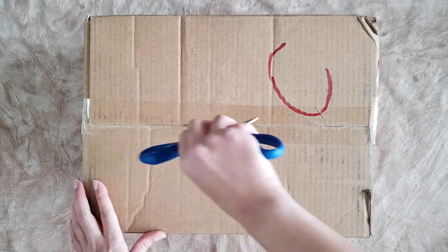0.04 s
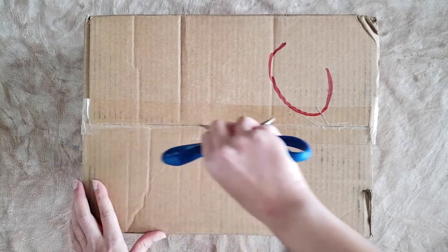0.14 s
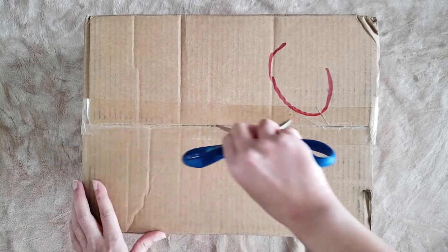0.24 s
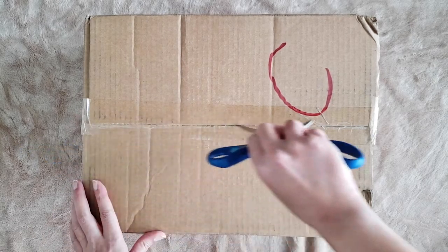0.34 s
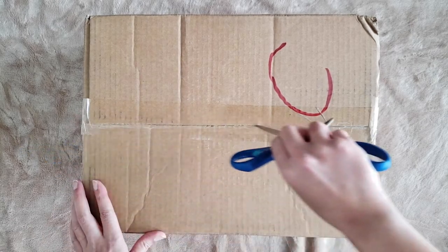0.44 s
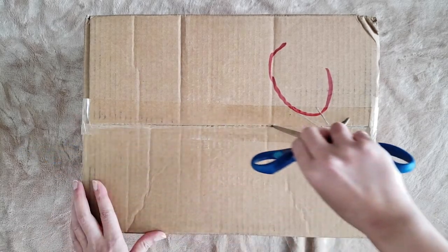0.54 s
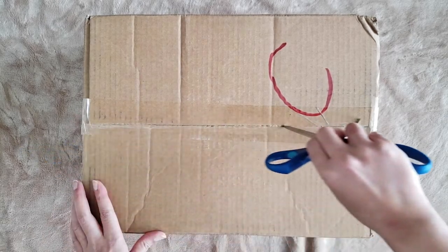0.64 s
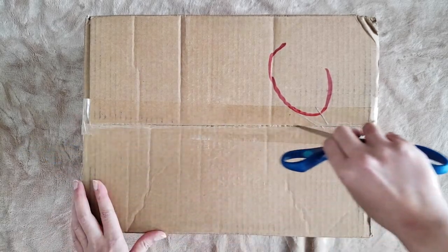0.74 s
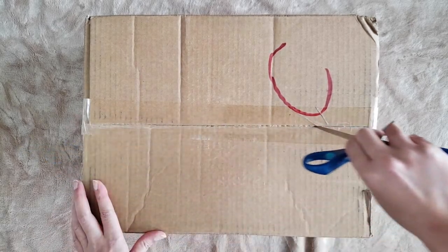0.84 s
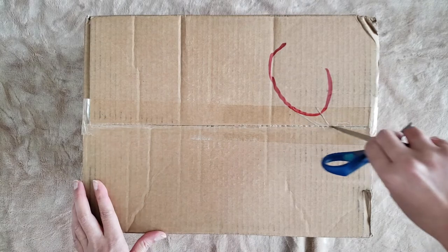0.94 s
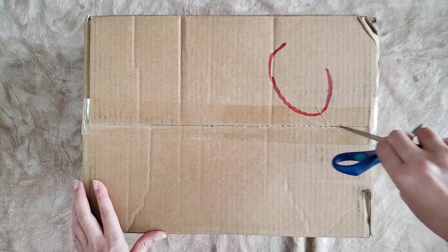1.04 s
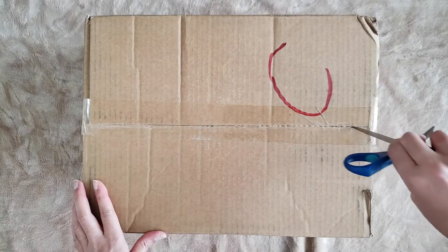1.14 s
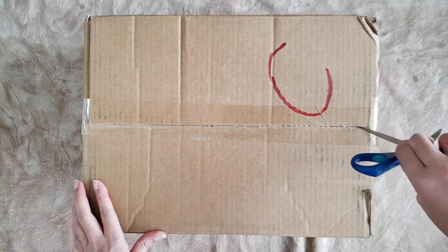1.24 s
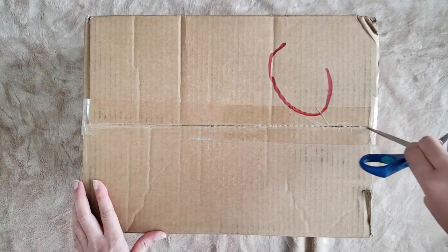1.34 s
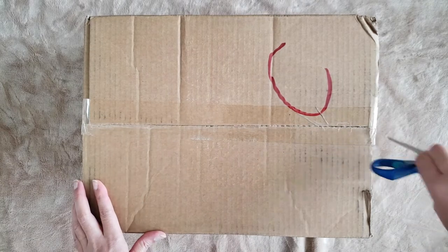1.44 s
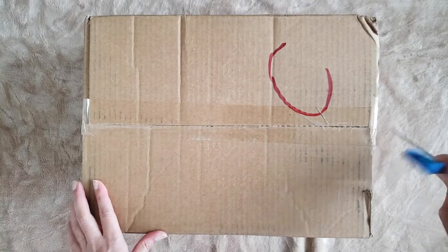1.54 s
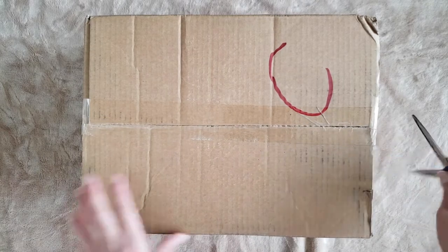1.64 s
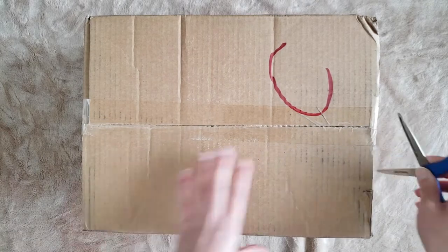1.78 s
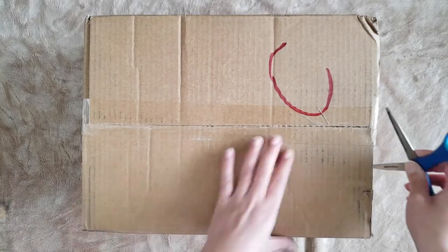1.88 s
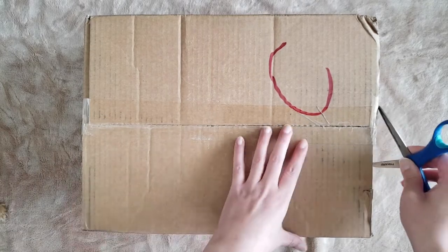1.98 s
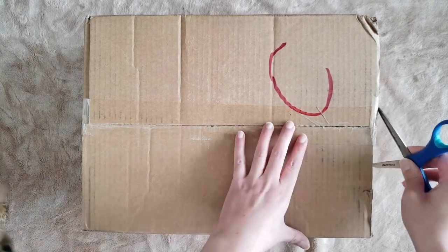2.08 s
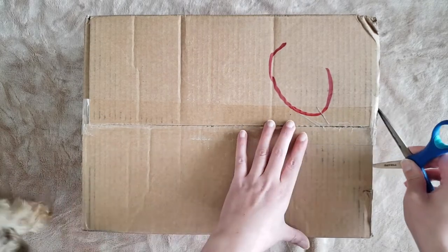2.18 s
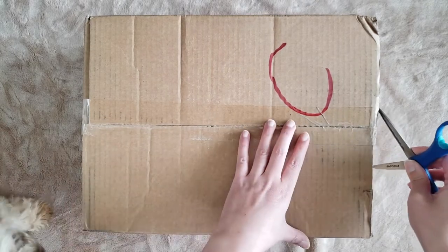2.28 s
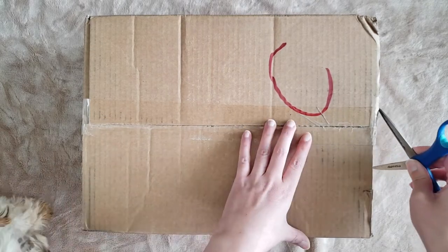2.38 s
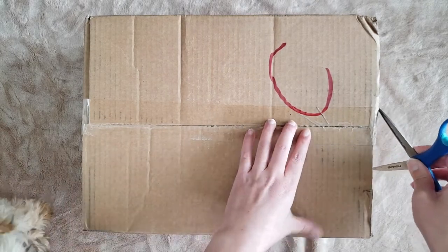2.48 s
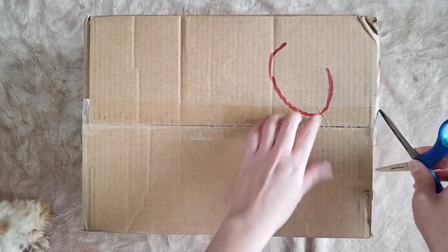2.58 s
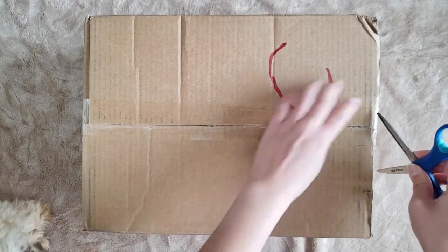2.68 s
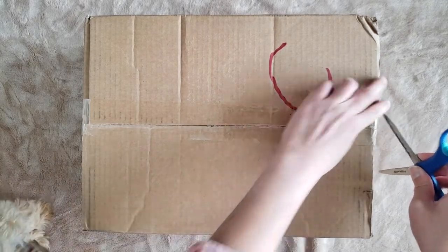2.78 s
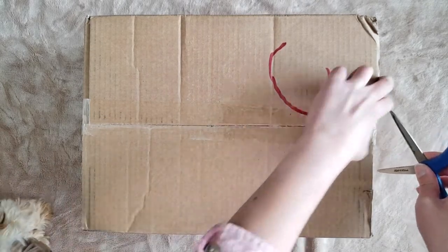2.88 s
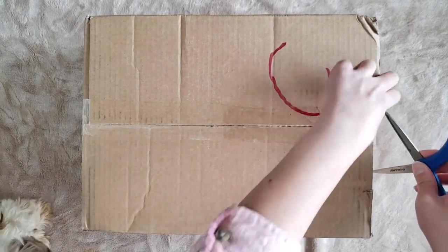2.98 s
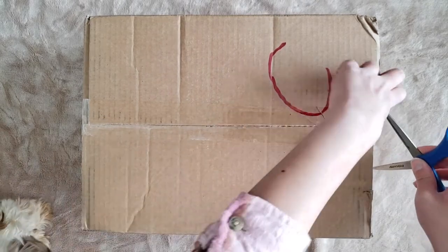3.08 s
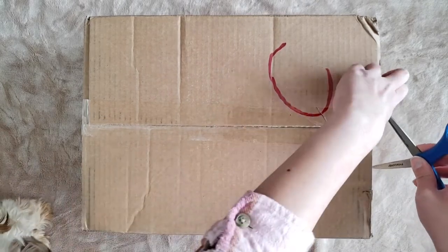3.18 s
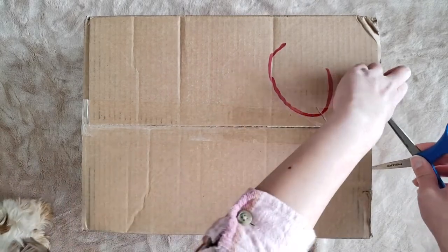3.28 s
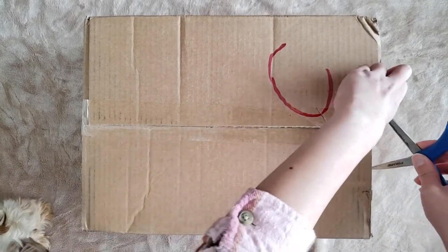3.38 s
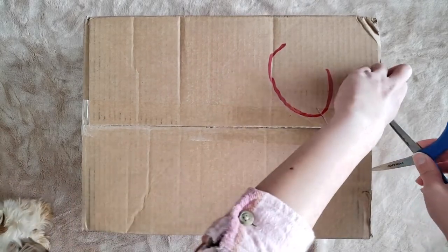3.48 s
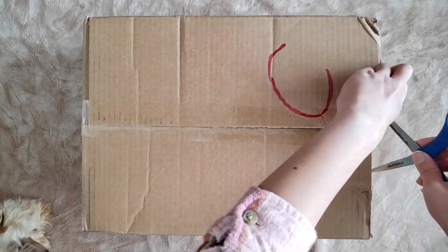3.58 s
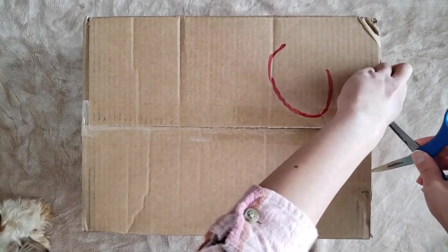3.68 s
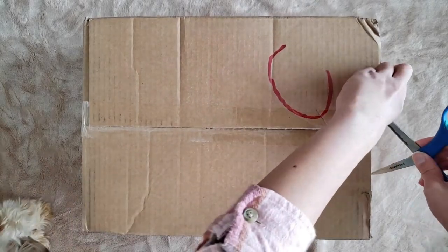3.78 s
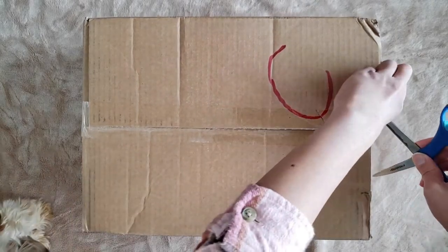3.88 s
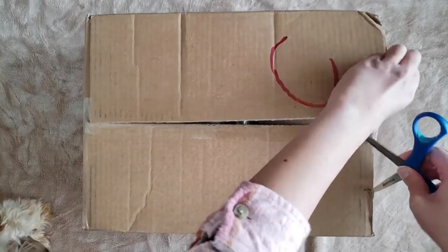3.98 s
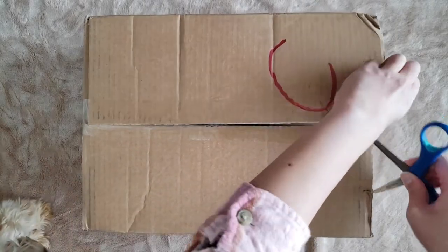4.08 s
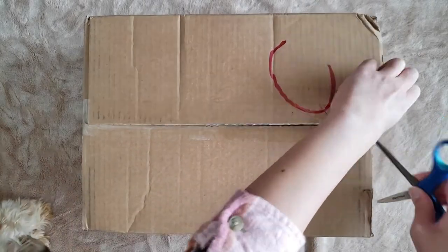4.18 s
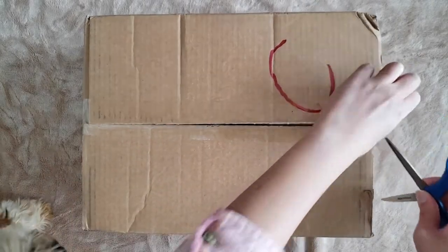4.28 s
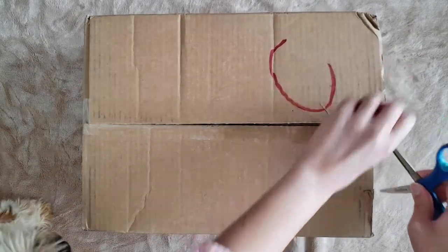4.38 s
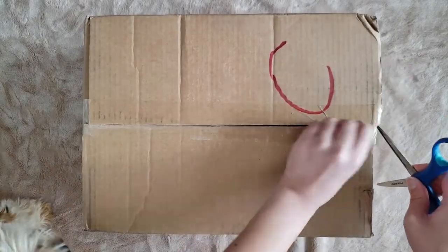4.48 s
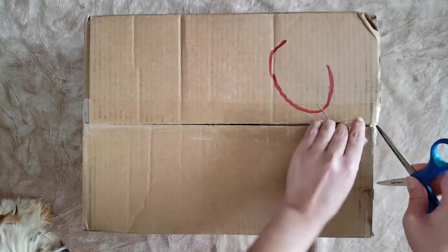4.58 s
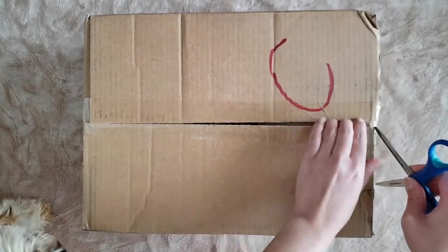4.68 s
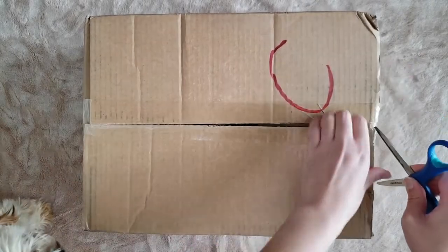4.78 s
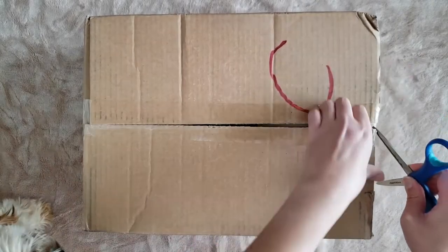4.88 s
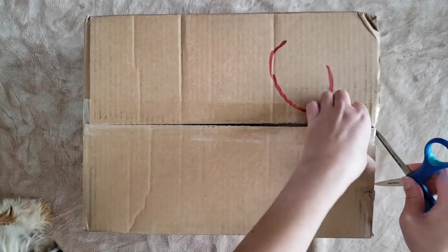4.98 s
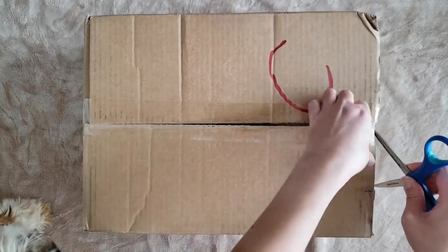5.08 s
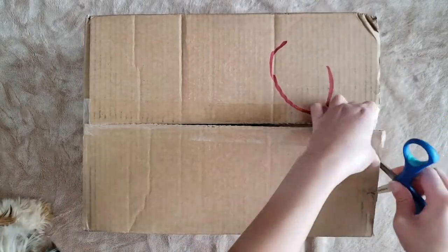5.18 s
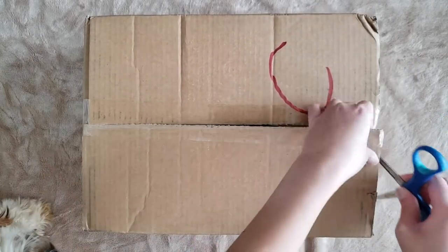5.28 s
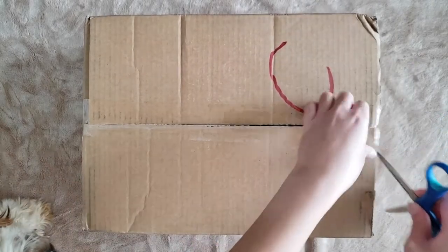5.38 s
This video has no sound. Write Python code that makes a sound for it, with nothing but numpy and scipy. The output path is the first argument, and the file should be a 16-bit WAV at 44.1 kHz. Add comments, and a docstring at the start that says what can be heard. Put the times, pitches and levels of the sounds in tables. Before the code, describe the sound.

Packing tape is slit with a scissor blade, a quick, ribbed scraping over hollow cardboard. After a brief swish comes a quieter stretch of hand rubbing, light taps and crinkling tape. The ticks grow busier until the scissors snip through taut tape with a crack and a thump, then snip again. The microphone is close, in a small room with a faint low hum.

```python
"""Slitting a taped cardboard box.

A scissor blade is drawn along the seam, close up in a small room. It skips from rib to rib,
each slip a rasp of tape and a kick into the box. Then a hand rubs and knocks on the lid,
the tape crackles, the blades click, and two snips snap the taut ends and jolt the flaps."""
import sys
import numpy as np
from scipy import signal
from scipy.fft import rfft, irfft, next_fast_len
from scipy.io import wavfile

SR = 44100
rng = np.random.default_rng(int(sys.argv[2]) if len(sys.argv) > 2 else 0)


def generate_wav(signal):
    """Clip the signal to [-1, 1] and save it as 16-bit WAV at the path in sys.argv[1]."""
    frames = np.transpose(np.atleast_2d(signal))
    scaled = np.clip(frames, -1, 1) * 32767
    pcm = np.round(scaled).astype(np.int16)
    wavfile.write(sys.argv[1], SR, pcm)


N = 239507
TIME = np.arange(N) / SR

# blade speed: t/s, rate/(ribs/s)
BLADE_SPEED = [(0.0, 34.32), (0.273, 27.87), (0.293, 45.16), (0.415, 36.46), (0.507, 37.99), (0.525, 19.56),
               (0.608, 43.57), (0.705, 11.63), (0.767, 38.92), (0.805, 30.59), (0.922, 38.96),
               (0.984, 20.33), (1.168, 18.18), (1.32, 7.38)]
# blade pressure on the seam: t/s, rasp/dB, treble/dB, kick/dB
BLADE_BITE = [(0, -28.5, -29.5, -26), (.14, -37.5, -40, -30.5), (.205, -24.5, -30, -22),
              (.27, -24.5, -27, -22.5), (.345, -31, -38.5, -30), (.41, -24.5, -37.5, -19.5),
              (.455, -29.5, -37.5, -28.5), (.61, -35, -38.5, -28.5), (.66, -38.5, -41.5, -23.5),
              (.8, -37, -46.5, -39), (.87, -30, -38.5, -23), (1.04, -35.5, -35, -24.5),
              (1.1, -29.5, -33, -25), (1.155, -26, -32.5, -26), (1.21, -32.5, -38.5, -33.5),
              (1.3, -35, -34.5, -39)]
def slips():
    """One slip per rib; a harder bite lets go faster. Rows: t/s, rasp/dB, treble/dB, length/s, kick/dB."""
    ribs_per_s = follow(BLADE_SPEED) * (TIME < BLADE_SPEED[-1][0])
    ribs_crossed = np.floor(.5 + np.cumsum(ribs_per_s) / SR)
    at = np.flatnonzero(np.diff(ribs_crossed))
    stretch, kick_jitter = rng.standard_normal((2, len(at)))
    rasp_db, treble_db, kick_db = (follow(BLADE_BITE, column)[at] for column in (1, 2, 3))
    length_s = 0.0077 * np.exp(0.16 * stretch - 0.0047 * (rasp_db - rasp_db.mean()))
    return np.c_[TIME[at], rasp_db, treble_db, length_s, kick_db + 0.3 * kick_jitter]


# lid stiffening toward the edge: t/s, box pitch/ratio, corner/Hz
LID_STIFFNESS = [(0, 0.9, 290), (.25, 0.89, 237), (.42, 1, 296), (.95, 0.99, 255), (1.05, 1.115, 645),
                 (1.3, 1.24, 780)]
# rips through the folded tape at the edge: t/s, level/dB, length/s
EDGE_RIPS = [(1.358, -39, 0.029), (1.416, -37, 0.02), (1.435, -31.5, 0.0081)]
# steady drag between ribs: t/s, level/dB, treble/dB
BLADE_DRAG = [(0, -40.5, -56), (.18, -40, -47.5), (.3, -43, -60), (.62, -47, -66.5), (1.0, -45.5, -58.5),
              (1.33, -50.5, -61), (1.55, -51, -66)]
# tape rasp: f/Hz, level/dB
RASP_SPECTRUM = [(150, -42), (350, 11), (700, 4.5), (1100, 0), (1400, -6), (2350, -4), (2750, -13.5),
                 (3300, -3.5), (4000, -5.5), (5000, -2), (7700, 4.5), (8600, -3), (12000, -12),
                 (16000, -31)]
# blade resonances: f/Hz, width/Hz, level/dB
BLADE_MODES = [(1587, 19, 4.5), (2530, 130, -2), (3300, 220, -11), (4050, 190, 4), (5500, 83, -10),
               (6540, 140, -7), (7470, 77, -9)]
def slitting():
    """Each slip swells as the blade bites, stops short, and kicks the box at the next rib."""
    mids, treble, box, paper = np.zeros((4, N))
    pitch, corner_hz = follow(LID_STIFFNESS), follow(LID_STIFFNESS, column=2)
    cuts = [(s, db, db + 1.5, length_s) for s, db, length_s in EDGE_RIPS]
    for s, db, treble_db, length_s, kick_db in slips():
        cuts.append((s, db, treble_db, length_s))
        at = round(s * SR)
        add(box, s + 0.00153, blow(kick_db, corner_hz[at], pitch[at], t60_scale=0.74, scatter=0.03))
    for s, db, treble_db, length_s in cuts:
        t = np.arange(-SR // 20, SR // 20) / SR
        swell = np.exp(-abs(t / length_s / np.where(t < 0, .8, .6)) ** 2.6)
        start_s = s + t[0]
        add(mids, start_s, amp(db) * swell)
        add(treble, start_s, amp(treble_db) * swell)
        for hz in 650 * 5.63 ** rng.random(size=4):  # each rib has its own papery pitches
            crackle = resonate(swell * rng.standard_normal(len(t)), hz, width_hz=hz / 9)
            add(paper, start_s, amp(db) * crackle / abs(crackle).max())
    dragging = np.clip((BLADE_DRAG[-1][0] - TIME) / .1, 0, 1)
    mids = amp(-4.5) * mids + dragging * amp(follow(BLADE_DRAG))
    treble = amp(-6) * treble + dragging * amp(follow(BLADE_DRAG, column=2))
    fibres = grains(per_s=6800, spread_db=3.5)
    rasp = two_band(fibres * mids, fibres * treble, RASP_SPECTRUM, split_hz=2950)
    steel = sum(amp(db) * resonate(rasp, hz, width_hz) for hz, width_hz, db in BLADE_MODES)
    drone = (resonate(box, hz=255, width_hz=45)  # the hollow box rings on between kicks
             + amp(-1) * resonate(box, hz=312, width_hz=25)
             + amp(1.5) * resonate(box, hz=114, width_hz=35))
    return rasp + steel + amp(-6) * paper + amp(-4) * box + amp(-6) * drone


# nominal box modes: f/Hz, level/dB, t60/s
BOX_MODES = [(70.3, -14, 0.23), (103.7, -4.5, 0.1), (128.7, -11.5, 0.16), (193, -1, 0.046),
             (247.6, 3.5, 0.063), (296.4, 3, 0.06), (368.6, 0, 0.051), (441, -3.5, 0.078),
             (510, -17.5, 0.12), (557, -2, 0.064), (648, 18.5, 0.0062), (798, -9, 0.11), (875, -39, 0.17),
             (1106, -12.5, 0.089), (1390, 1, 0.023), (1630, 12, 0.0051), (2320, -26, 0.067)]
def blow(db, corner_hz, pitch, t60_scale, scatter):
    """A push rings the box; a soft one reaches only the low modes, and each spot favours others."""
    t = np.arange(SR // 4) / SR
    hz, mode_db, t60_s = np.transpose(BOX_MODES)[:, :, None]
    detune, favour = rng.standard_normal((2, len(BOX_MODES), 1))
    weight = amp(mode_db + 2.9 * favour) / (1 + (hz / corner_hz) ** 2)
    tuned_hz = hz * pitch * (1 + scatter * detune)
    modes = weight * amp(-60 * t / (t60_s * t60_scale)) * np.sin(2 * np.pi * tuned_hz * t)
    modes *= 1 - np.exp(-t * hz / 0.76)  # builds up in about one cycle
    polarity = np.where(hz < 350, -1, rng.choice([-1, 1], hz.shape))  # low modes all follow the push
    ring = (modes * polarity).sum(0) * (1 - (t / t[-1]) ** 2)
    attack_rms = np.sqrt(np.mean(ring[:SR // 100] ** 2))
    return amp(db) * ring / attack_rms


# tape snaps: t/s, crack/dB, treble over mids/dB, decay/s, fraying/dB, ring/dB
TAPE_SNAPS = [(1.63, -48.5, 11.5, 0.0036, -42, -33), (2.242, -69, 12, 0.00094, -44.5, -47),
              (3.1331, -34, 1, 0.0044, -33, -32), (3.5255, -33.5, 11, 0.0029, -36, -40),
              (3.9519, -17, 10, 0.0014, -20.5, -17), (3.9632, -19.5, 2, 0.0033, -39, -25),
              (4.87, -41, 17, 0.00047, -58, -49), (5.1442, -8.5, -2.5, 0.00087, -25, 2),
              (5.154, -27.5, -7, 0.019, -56, -54)]
# taut tape modes: f/Hz, level/dB, t60/s
TAPE_MODES = [(1410, -6.5, 0.012), (2400, -1.5, 0.0051), (7140, 13, 0.0026), (8120, 8.5, 0.0031)]
# sharp crack: f/Hz, level/dB
CRACK_SPECTRUM = [(200, -6.5), (700, 9.5), (1400, 6), (2000, 3), (2450, 1.5), (3100, -3.5), (4200, -3),
                  (5300, -1.5), (7000, 2.5), (8000, -2), (9200, -15), (11500, -19.5), (16000, -48)]
def snapping():
    """Taut tape parts with one sharp ringing crack, then its last fibres crackle away."""
    mids, treble, fray, ring = np.zeros((4, N))
    t = np.arange(SR // 4) / SR
    onset = 1 - np.exp(-(t / 0.00065) ** 2)
    for s, db, bright_db, decay_s, fray_db, ring_db in TAPE_SNAPS:
        crack = np.exp(-t / decay_s) * rng.choice([-1, 1], len(t))
        add(mids, s, amp(db + 1) * crack)
        add(treble, s, amp(db + 0.5 + bright_db) * crack)
        for hz, mode_db, t60_s in TAPE_MODES:
            start_db = ring_db + mode_db + bright_db * (hz > 3500)
            add(ring, s, amp(start_db - 60 * t / t60_s) * onset * np.sin(2 * np.pi * hz * t))
        add(fray, s, amp(fray_db) * (np.exp(-t / 0.0086) + 0.12 * np.exp(-t / 0.063)))
    fray *= grains(per_s=3200, spread_db=3.5)
    return ring + two_band(mids + amp(-4) * fray, treble + amp(1.5) * fray, CRACK_SPECTRUM, split_hz=3280)


# blows on the card: t/s, level/dB, corner/Hz, box pitch/ratio
BOX_KNOCKS = [(1.334, -35, 790, 1.22), (1.4204, -22.5, 650, 1.27), (1.4382, -34, 700, 1.46),
              (1.940, -33, 1060, 0.9), (2.63, -36, 516, 1.34), (2.828, -31, 563, 1.03),
              (2.939, -30.5, 400, 0.97), (3.134, -29, 790, 1.4), (3.143, -29.5, 497, 0.89),
              (3.526, -35.5, 600, 1.05), (3.953, -21, 600, 0.76), (3.967, -13, 140, 1.04),
              (3.978, -18.5, 900, 1.13), (4.095, -33, 408, 0.89), (4.308, -36.5, 790, 1.05),
              (4.504, -28.5, 402, 0.983), (4.542, -30.5, 462, 0.99), (4.652, -37.5, 1050, 1.19),
              (4.756, -35.5, 700, 1.17), (4.854, -34.5, 710, 1.11), (5.1451, -15.5, 714, 1.14),
              (5.1538, -15.5, 600, 1.1), (5.418, -39.5, 300, 1.04)]
def knocking(rebound_s=.04):
    """Fingers, blades and flaps strike and rebound once; crushed card springs less and dies sooner."""
    card = np.zeros(N)
    for s, db, corner_hz, pitch in BOX_KNOCKS:
        rebound_db = db - 12.5 - 20 * np.log10(1 + 8.2 * amp(db))
        for hit_s, hit_db in [(s, db), (s + rebound_s, rebound_db)]:
            t60_scale = 1.01 / (1 + 1.9 * amp(hit_db))
            add(card, hit_s, blow(hit_db, corner_hz, pitch, t60_scale, scatter=0.019))
    enclosed_air = resonate(card, hz=59, width_hz=6.2)
    return amp(2.5) * card + amp(-2.5) * enclosed_air


# sharp ticks of tape and blades: t/s, level/dB, f/Hz
SHARP_TICKS = [(2.4014, -39, 4900), (2.5313, -33, 7900), (2.6266, -30, 8000), (2.828, -28.5, 7700),
               (2.9342, -29, 6900), (3.4973, -28.5, 6240), (3.6695, -27, 4930), (3.8077, -29, 5400),
               (3.914, -26, 6400), (3.9972, -15.5, 6600), (4.0685, -30, 2200), (4.1173, -26.5, 2980),
               (4.311, -27.5, 6640), (4.3727, -18.5, 7140), (4.5067, -22.5, 7000), (4.796, -25.5, 7250),
               (4.851, -24, 6900), (4.885, -21, 6500), (5.035, -24.5, 5560), (5.2461, -26.5, 7100)]
def ticking():
    """Sharp little ticks, each at its own pitch: tape crackles and a ringing click of the blades."""
    out, t = np.zeros(N), np.arange(SR // 20) / SR
    envelope = (np.exp(-t / 0.0027) + 0.31 * np.exp(-t / 0.0048)) * (1 - np.exp(-t / 0.00033))
    for s, db, hz in SHARP_TICKS + crackles():
        burst = envelope * rng.standard_normal(len(t))
        tick = colour(resonate(burst, hz, width_hz=hz / 6) + 0.29 * burst, CRACK_SPECTRUM)
        add(out, s, amp(db - 2) * tick / abs(tick).max())
    return out


# tape strain, as crinkle loudness: t/s, level/dB
TAPE_STRAIN = [(1.45, -50.5), (1.8, -63), (2.2, -61), (2.3, -57.5), (2.8, -54.5), (2.95, -49.5),
               (3.07, -56.5), (3.48, -54), (3.82, -46.5), (3.95, -42.5), (4.09, -45), (4.17, -56),
               (4.29, -50.5), (4.4, -53.5), (4.7, -48.5), (4.87, -48.5), (5.09, -52), (5.17, -52.5),
               (5.43, -49)]
# tape crinkle: f/Hz, level/dB
CRINKLE_SPECTRUM = [(800, 1), (1700, -6), (2350, 1), (3100, -14.5), (4200, -8.5), (5600, -3.5),
                    (7000, -0.5), (8100, -6), (9200, -13), (12000, -36), (16000, -50)]
# lid murmur: f/Hz, level/dB
MURMUR_SPECTRUM = [(120, 3), (300, 8), (500, 11.5), (800, 1), (1500, 0), (2400, -11), (3500, -28),
                   (8000, -83)]
def rubbing():
    """Strained tape crinkles and the lid murmurs under the pressing hand."""
    tape = colour(grains(per_s=1300, spread_db=3.5), CRINKLE_SPECTRUM)
    lid = colour(grains(per_s=1800, spread_db=-1.5), MURMUR_SPECTRUM)
    fade_in = np.clip((TIME - 1.4) / 0.19, 0, 1)
    strain_db = follow(TAPE_STRAIN)
    return fade_in * (amp(strain_db - 4) * tape + amp(0.59 * strain_db - 28.5) * lid)


def crackles(per_s=20, low_share=.18, low_hz=2300, high_hz=7340):
    """Small random crackles, louder the more the tape is strained. Rows: t/s, level/dB, f/Hz."""
    wait, kind = rng.random((200, 2)).T
    size, detune = rng.standard_normal((200, 2)).T
    s = TAPE_STRAIN[0][0] + np.cumsum(-np.log(1 - wait)) / per_s
    db = np.interp(s, *np.transpose(TAPE_STRAIN)) + 17.5 + 2.5 * size
    hz = np.where(kind < low_share, low_hz, high_hz) * np.exp(0.068 * detune)
    return np.c_[s, db, hz][s < N / SR].tolist()


# hand slides: t/s, level/dB, rise/s, fall/s
HAND_STROKES = [(1.44, -30, 0.022, 0.015), (1.961, -44.5, 0.022, 0.073), (2.5, -56, 0.063, 0.02),
                (2.63, -52.5, 0.076, 0.16), (4.96, -56.5, 0.049, 0.19), (5.42, -61, 0.3, .04)]
# skin on card: f/Hz, level/dB
PALM_SPECTRUM = [(800, 7), (2050, -7.5), (2550, -5.5), (3100, -9.5), (4000, -1), (5500, -2.5), (7600, 1.5),
                 (9000, -7.5), (11500, -16), (16000, -44)]
def stroking():
    """Each slide of the hand is a papery swish over the grain of the card."""
    envelope = np.zeros(N)
    for s, db, rise_s, fall_s in HAND_STROKES:
        slope_s = np.where(TIME < s, rise_s, fall_s)
        envelope += amp(db) * np.exp(-abs((TIME - s) / slope_s) ** 1.1)
    return envelope * colour(grains(per_s=9000, spread_db=5), PALM_SPECTRUM)


# fingertip judders: t/s, level/dB, length/s, f/Hz
FINGER_JUDDERS = [(2.068, -42, 0.045, 875), (2.608, -55, 0.14, 2630), (2.951, -42, 0.063, 6100),
                  (3.55, -36.5, 0.038, 5240), (3.65, -44.5, 0.22, 474), (4.106, -35, 0.05, 390),
                  (4.284, -38.5, 0.023, 603), (4.533, -31, 0.048, 570), (4.779, -29, 0.047, 550),
                  (4.793, -37.5, 0.057, 1300), (5.134, -35, 0.025, 5860)]
def juddering(slips_per_s=1000):
    """A fingertip sticks and slips unevenly, exciting one patch of the lid or of the tape."""
    out, t = np.zeros(N), np.arange(-SR // 10, SR // 10) / SR
    for s, db, length_s, hz in FINGER_JUDDERS:
        jerks = rng.standard_normal(len(t)) * (rng.random(len(t)) < slips_per_s / SR)
        edge_ratio = 1.16 + 250 / (hz + 250)  # small high patches ring more narrowly
        band = signal.butter(2, [hz / edge_ratio, hz * edge_ratio], "bandpass", fs=SR, output="sos")
        patch = unit(signal.sosfilt(band, jerks))
        add(out, s + t[0], amp(db - 5.5) * patch * np.exp(-(2.1 * t / length_s) ** 2))
    return out


# room decay: f/Hz, t60/s
ROOM_DECAY = [(100, 0.32), (400, 0.27), (1500, 0.37), (6000, 0.22), (14000, 0.08)]
def room(x, wet_db, delay_s, echoes_per_s=3000):
    """Adds a short tail of scattered echoes, each band dying at its own speed."""
    echoes = rng.choice([-1., 1.], SR // 2) * (rng.random(SR // 2) < echoes_per_s / SR)
    hz, t, bands = signal.stft(echoes, SR, nperseg=256)
    decay = amp(-60 * t / at_hz(ROOM_DECAY, hz)[:, None])
    _, tail = signal.istft(bands * decay, SR, nperseg=256)
    out = x.copy()
    add(out, delay_s, amp(wet_db) * signal.oaconvolve(x, tail / np.linalg.norm(tail))[:N])
    return out


# room hum: f/Hz, width/Hz, level/dB
HUM_BANDS = [(68.4, 17.5, -2), (136, 24, -7.5), (302.6, 20, -17.5)]
# still air: f/Hz, level/dB
AIR_SPECTRUM = [(15, -62), (25, -18), (44, -5), (70, -1.5), (96, -7), (145, -14.5), (175, -9.5),
                (292, -16.5), (334, -16.5), (1430, -33.5), (1560, -29.5), (2150, -54), (3140, -41.5),
                (5530, -46.5), (15800, -64)]
def background():
    """Still air and the low hum of the room."""
    hum = sum(amp(db) * noise(lambda hz: 1 / (1 + (2 * (hz - centre_hz) / width_hz) ** 2))
              for centre_hz, width_hz, db in HUM_BANDS)
    air = noise(lambda hz: amp(at_hz(AIR_SPECTRUM, hz)))
    return amp(-40.5) * hum + amp(-43.5) * air


def grains(per_s, spread_db):
    """Fibres breaking: random clicks of uneven size, rms 1."""
    sizes = amp(spread_db * np.minimum(rng.exponential(1, N), 4)) * rng.choice([-1, 1], N)
    return unit(sizes * (rng.random(N) < per_s / SR))


def noise(gain):
    """Steady noise of rms 1 with spectrum gain(hz)."""
    size = next_fast_len(N)
    spectrum = rfft(rng.standard_normal(size)) * gain(np.fft.rfftfreq(size, 1 / SR))
    return unit(irfft(spectrum, size)[:N])


def resonate(x, hz, width_hz):
    """One resonance, gain 1 at its peak."""
    return signal.lfilter(*signal.iirpeak(min(hz, SR / 3), hz / width_hz, SR), x)


def colour(x, spectrum, size=2048):
    """Minimum-phase filter of unit energy with the given spectrum."""
    log_gain = np.log(amp(at_hz(spectrum, abs(np.fft.fftfreq(size, 1 / SR)))))
    taps = np.fft.ifft(np.exp(np.conj(signal.hilbert(log_gain)))).real[:size // 2]
    return signal.oaconvolve(x, taps / np.linalg.norm(taps))[:len(x)]


def two_band(mids, treble, spectrum, split_hz):
    """Colours one drive below the split and one above, each filter of unit energy."""
    hz = np.geomspace(50, SR / 2, 160)
    low_share = 1 / (1 + (hz / split_hz) ** 8)
    return sum(colour(x, np.c_[hz, at_hz(spectrum, hz) + 10 * np.log10(share + 1e-7)])
               for x, share in [(mids, low_share), (treble, 1 - low_share)])


def amp(db):
    """Decibels to gain."""
    return 10 ** (np.asarray(db) / 20)


def unit(x):
    """Scales to rms 1."""
    return x / np.sqrt(np.mean(x ** 2) + 1e-20)


def at_hz(rows, hz):
    """Interpolates a table on a log-frequency axis."""
    row_hz, value = np.transpose(rows)
    return np.interp(np.log(hz + 1), np.log(row_hz + 1), value)


def follow(rows, column=1):
    """One column of a time curve at every sample."""
    rows = np.asarray(rows)
    return np.interp(TIME, rows[:, 0], rows[:, column])


def add(mix, s, sound):
    """Lays a sound into the mix at time s."""
    start = round(s * SR)
    part = mix[max(start, 0):max(start + len(sound), 0)]
    part += sound[max(-start, 0):][:len(part)]


def scene():
    """Blade, tape and hand on the box, in the room; mono."""
    box = slitting() + snapping() + knocking() + ticking() + rubbing() + stroking() + juddering()
    return (room(box, wet_db=-12.5, delay_s=.006) + background())[None]


def record(dry, low_cut_hz=38, high_cut_hz=15850):
    """The microphone sheds deep bass, the hardest snaps clip, and the top treble is cut."""
    thinned = signal.sosfilt(signal.butter(2, low_cut_hz, "highpass", fs=SR, output="sos"), dry)
    clipped = np.clip(thinned, -.9, .9)
    lowpass = signal.firwin(401, high_cut_hz, window=("kaiser", 9), fs=SR)
    return signal.oaconvolve(clipped, lowpass[None], "same")


dry = scene()
out = record(dry)
generate_wav(out)
```